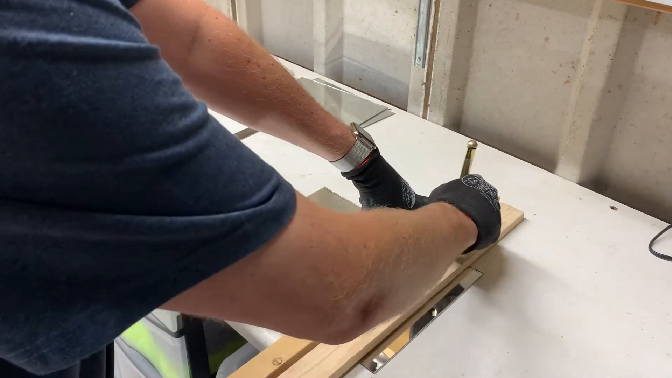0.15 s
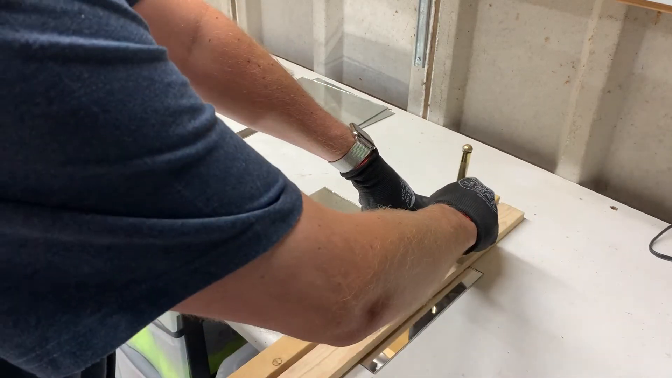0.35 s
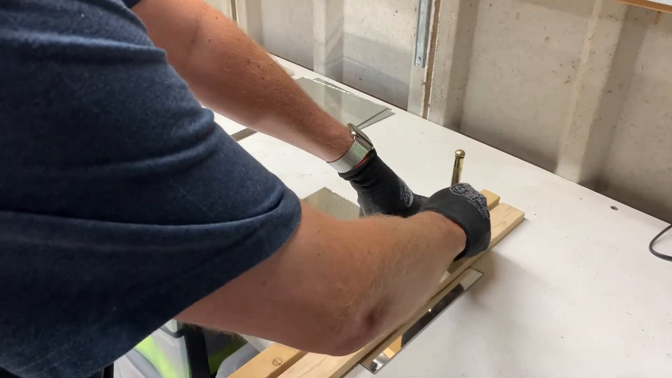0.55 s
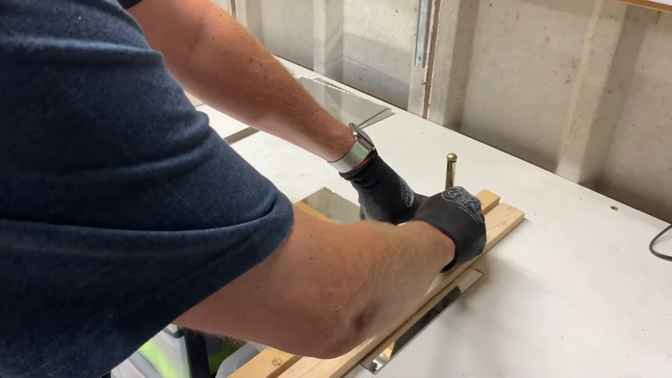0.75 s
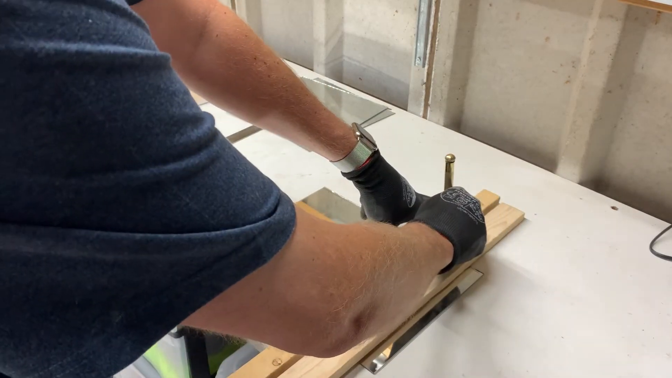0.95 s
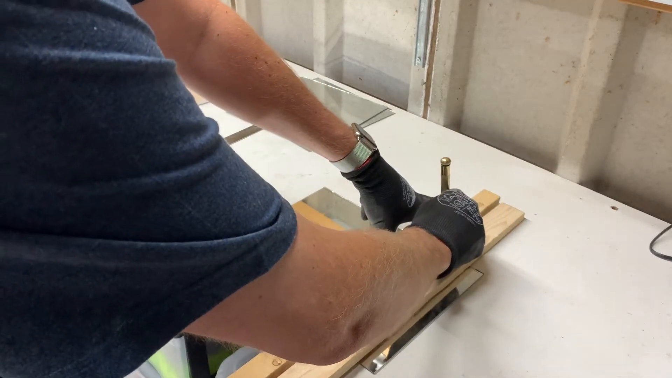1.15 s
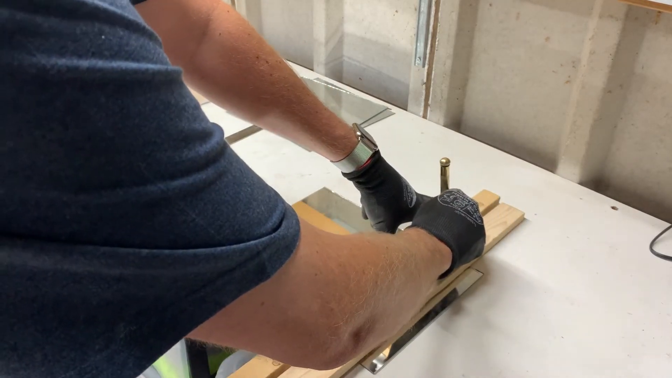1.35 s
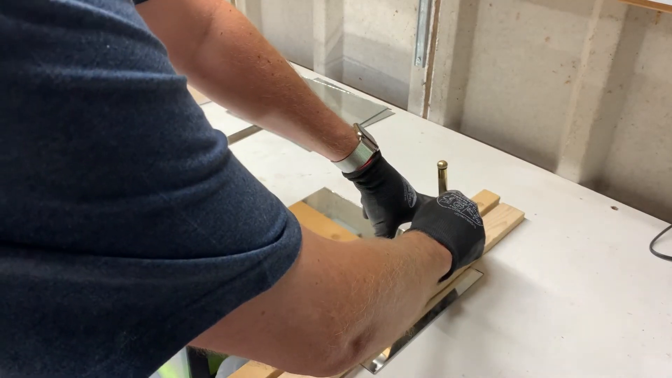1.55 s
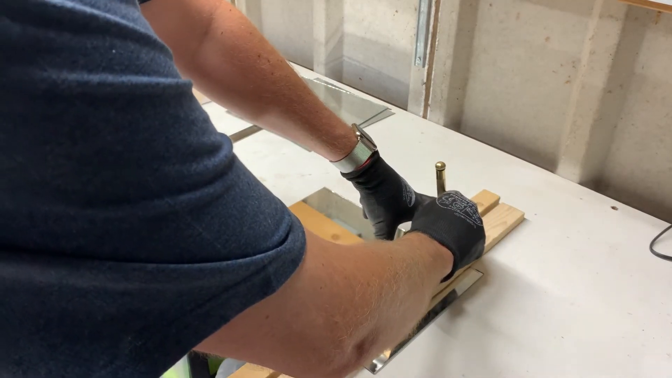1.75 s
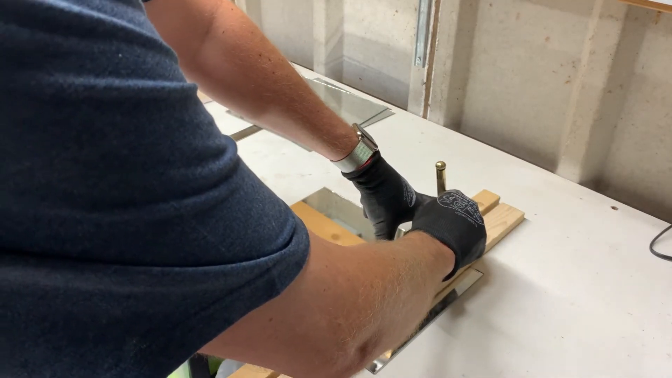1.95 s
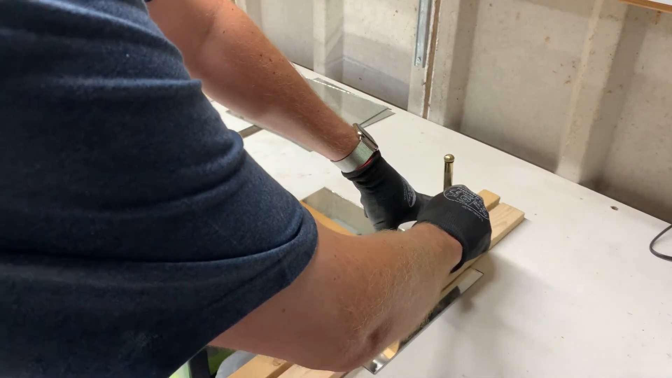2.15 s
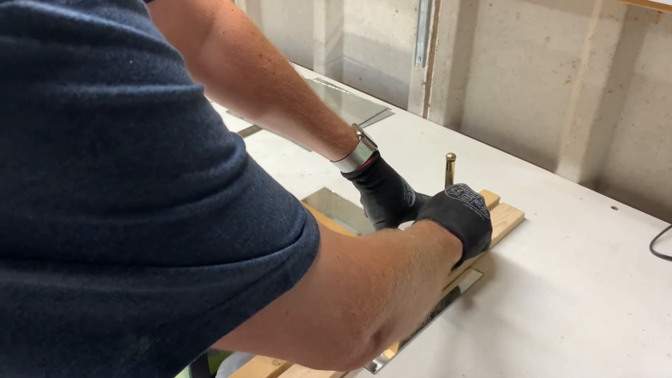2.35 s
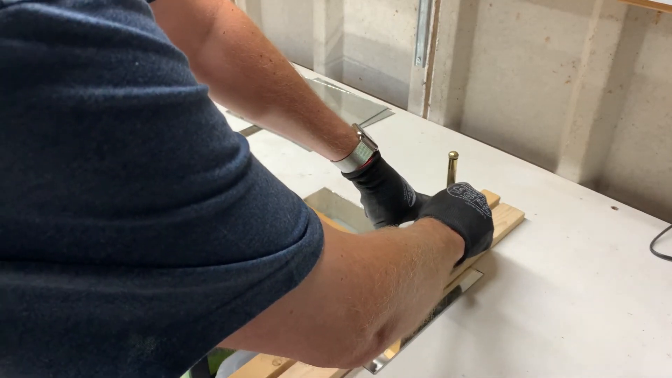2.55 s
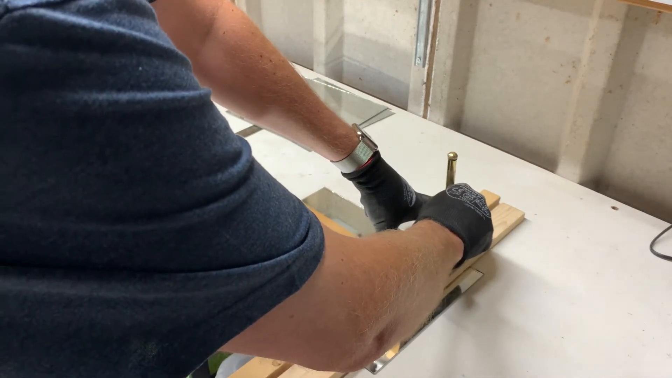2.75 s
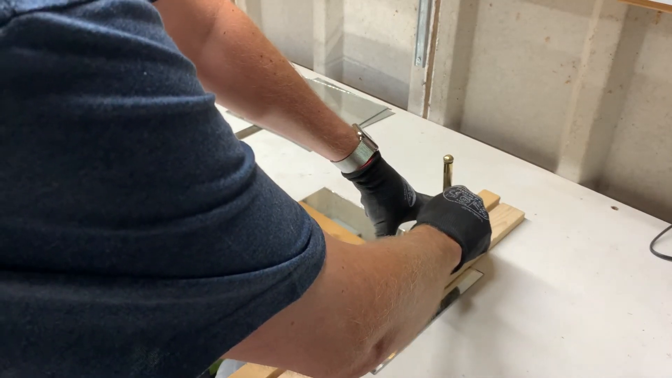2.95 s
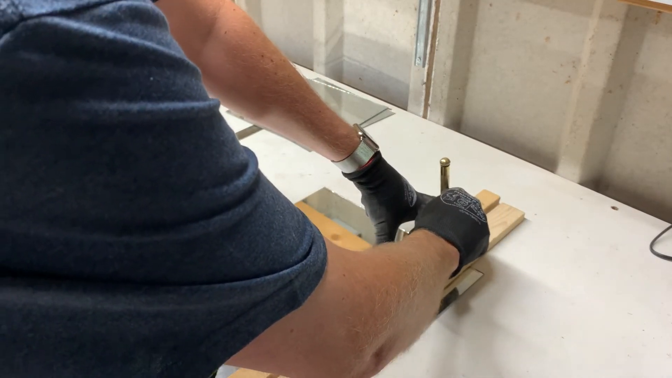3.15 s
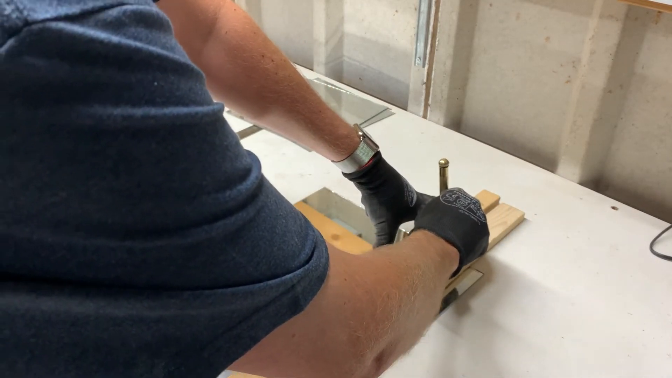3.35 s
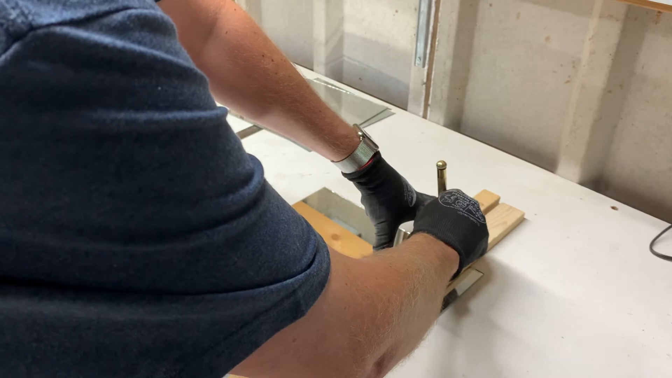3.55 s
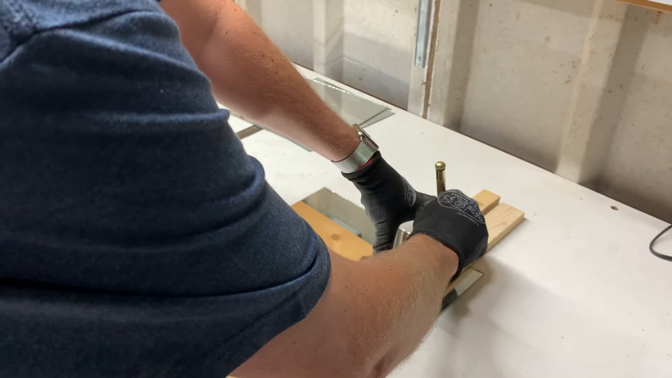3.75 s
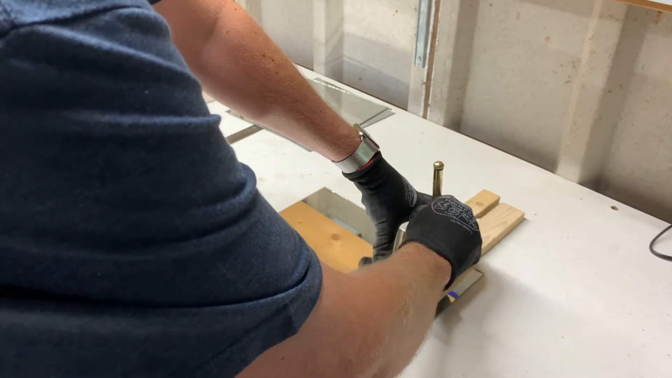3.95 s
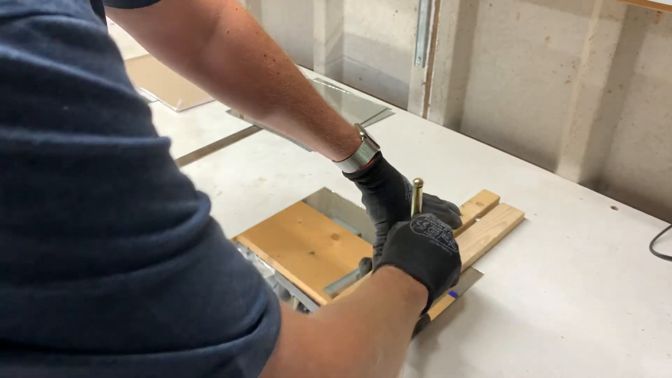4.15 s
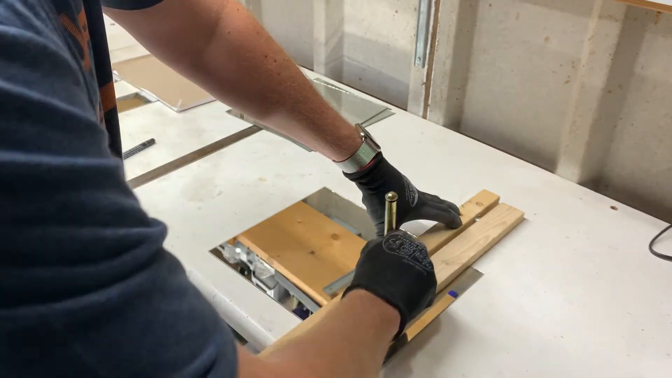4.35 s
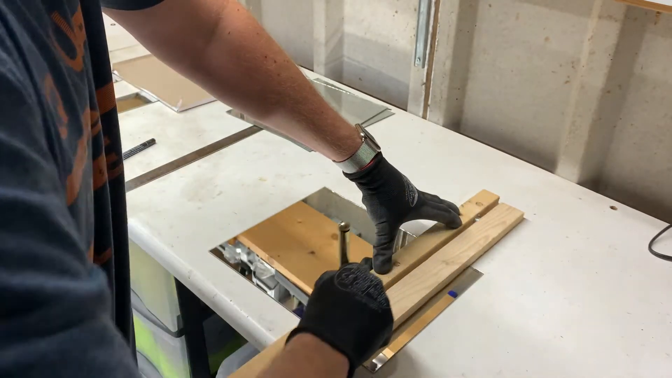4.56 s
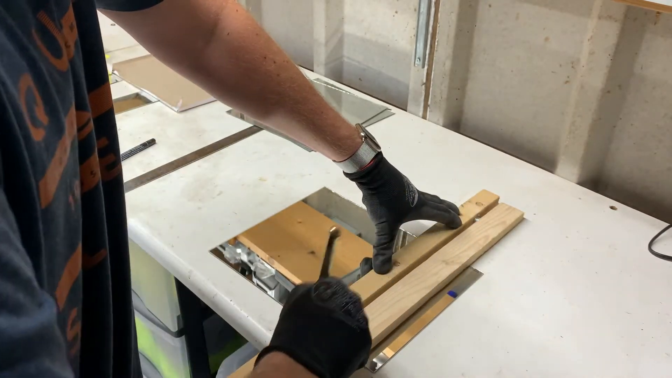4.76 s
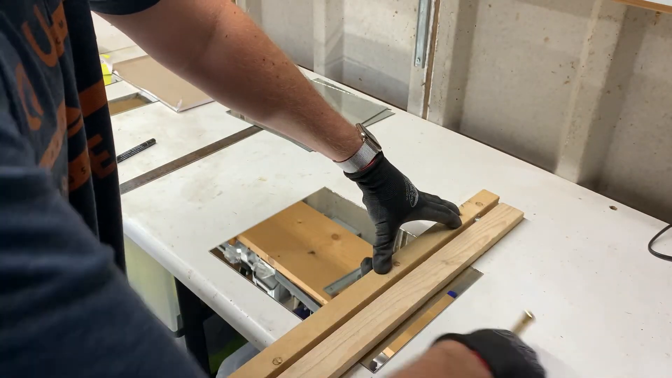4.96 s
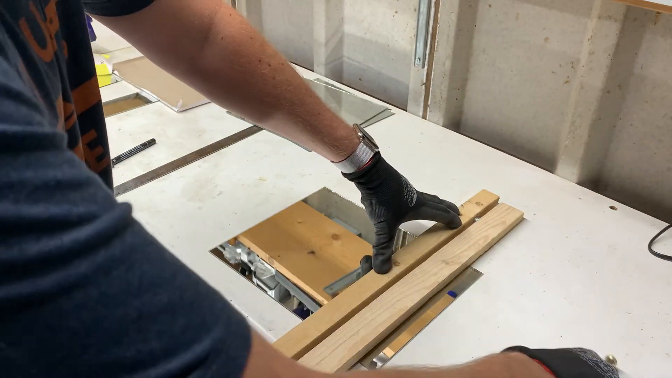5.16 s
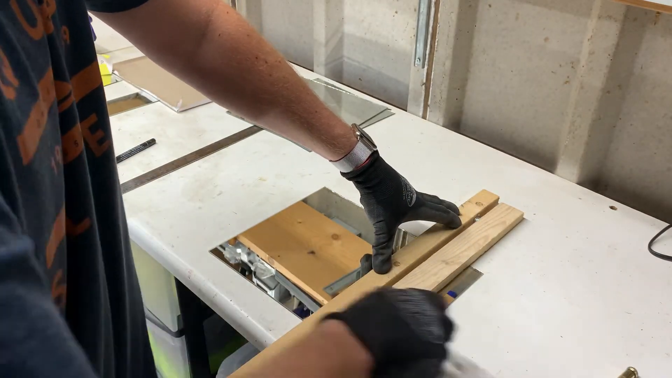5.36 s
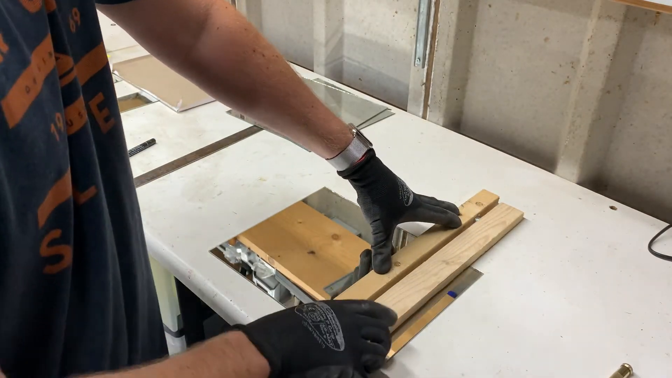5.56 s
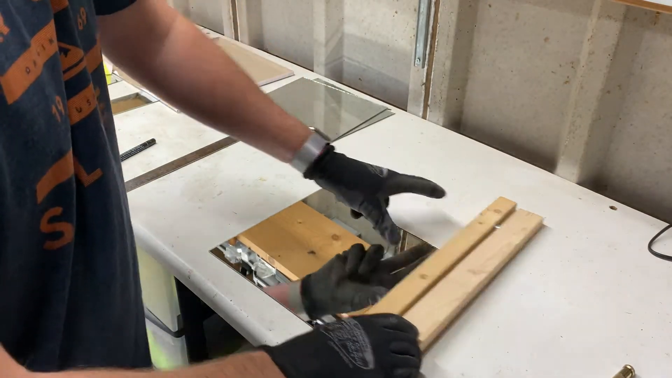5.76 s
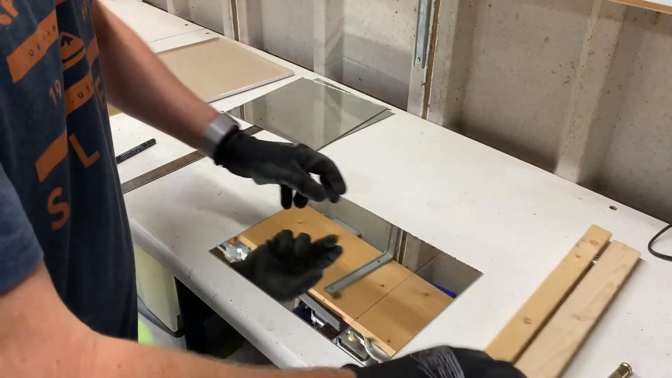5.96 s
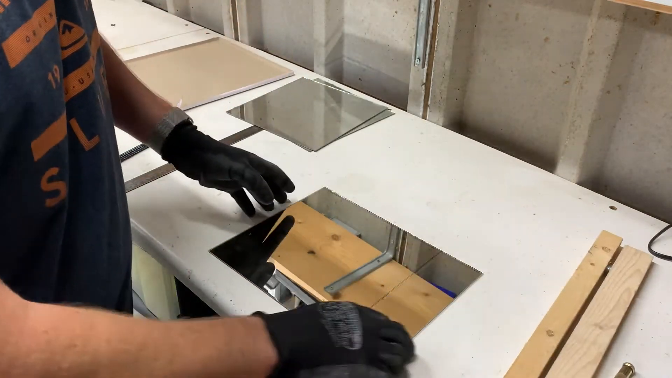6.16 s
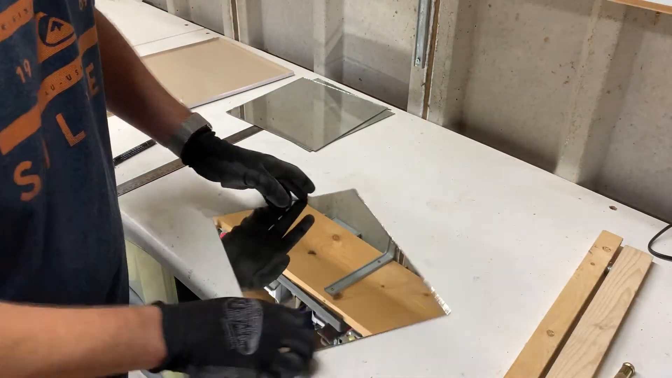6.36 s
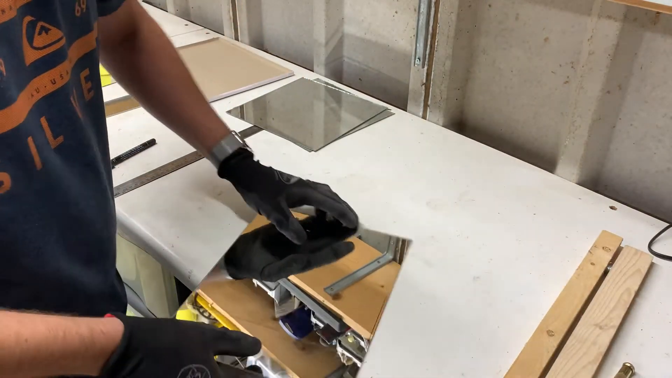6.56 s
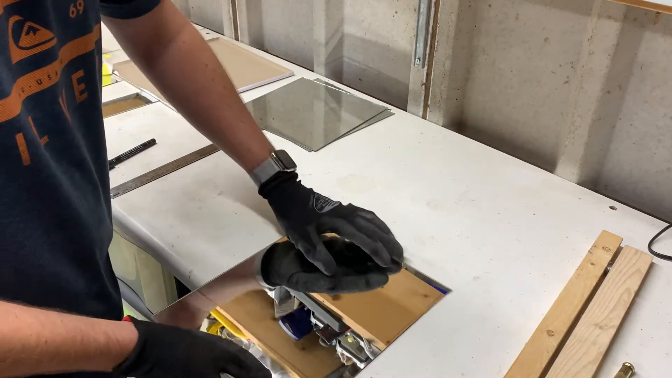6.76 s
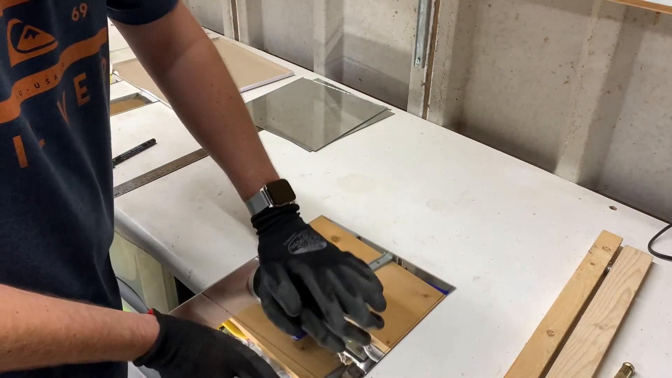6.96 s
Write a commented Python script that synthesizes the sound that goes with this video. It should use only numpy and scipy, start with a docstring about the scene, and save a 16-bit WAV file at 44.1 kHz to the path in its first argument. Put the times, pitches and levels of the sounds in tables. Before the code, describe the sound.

A glass-cutter wheel ticks on a mirror, hisses through one rising score, knocks off the edge, then the cutter clatters down and wood and glass scrape.

```python
"""In the quiet air of a small shed a glove brushes a workbench and a straightedge bumps down. A glass-cutter wheel
ticks as it is lined up on a mirror, hisses along the score, runs off the edge onto the bench, is dropped and skids.
The straightedge is dragged away, bumping; then the mirror is slid and turned on the bench top.
Blows are decaying modes and noise bursts; rubbing is random grit filtered by spectra and resonances.
The thin walls add a short diffuse tail, and two ports with a frequency-dependent likeness listen."""
import sys
import numpy as np
from scipy import signal
from scipy.fft import rfft, irfft, next_fast_len
from scipy.io import wavfile
from scipy.ndimage import map_coordinates

SR = 44100
rng = np.random.default_rng(int(sys.argv[2]) if len(sys.argv) > 2 else 0)


def inscribe(sig):
    """Save sig as 16-bit PCM at rate SR to the path in sys.argv[1].

    A 1-D sig is mono; a 2-D sig holds one channel per row.
    Samples are clipped to [-1, 1] before scaling.
    """
    pcm = np.round(np.clip(np.atleast_2d(sig).T, -1, 1) * 32767)
    wavfile.write(sys.argv[1], SR, pcm.astype(np.int16))


def invert_db(x):
    """Field ratio 10**(x/20) for x, a level in decibels (scalar or array-like)."""
    u = np.asarray(x, float) / 20
    return 10 ** u


N = 309141

# background air of the shed: (frequency [Hz], relative density [dB per Hz])
AIR_SPECTRUM = [(25, -9.5), (60, 8), (100, -2), (280, -10), (900, -20), (2600, -29.5), (7500, -31.5),
                (9000, -23.5), (10000, -30.5), (15500, -31)]
AIR_DB = -59.5  # rms level of the air
# glove over wood and bench: (time [s], bench rumble [dB], hiss [dB])
BRUSH_STROKE = [(0.101, -58, -98), (.25, -44, -84), (.45, -52, -76.5), (.62, -39, -64.5), (.74, -66, -77),
                (2.06, -96, -81), (2.21, -64, -69), (2.3, -92, -108), (3.2, -80, -74), (3.45, -77, -89.5),
                (4.9, -42, -74.5), (5.061, -50, -64), (5.13, -61.5, -83.5)]
BRUSH_SCRAPE_DB = -4.5  # scrape against the mean of rumble and hiss
# straightedge bumps the bench:
# (time [s], woody knock [dB], knock pitch [Hz], bench boom [dB], tick [dB])
BUMPS = [(0.1575, -53, 880, -67, -71), (0.1969, -33, 480, -37, -53), (0.4911, -26.5, 1260, -36, -33),
         (0.5834, -32.5, 640, -34.5, -49), (5.959, -26, 810, -55, -33.5), (6.0306, -17, 800, -31, -20.5),
         (6.0519, -16, 1750, -13, -28), (6.0823, -17.5, 830, -13.5, -51), (6.144, -22, 280, -14, -60),
         (6.2046, -26.5, 1820, -22.5, -50)]
BUMP_CLICK_DB = -16.5  # click against knock
# wheel touches the mirror:
# (time [s], click [dB], glassy tick [dB], woody knock [dB], knock pitch [Hz])
TOUCHES = [(0.5577, -30.5, -34, -31, 1640), (0.9167, -35, -30, -46, 2040), (0.938, -45, -37.5, -48, 352),
           (1.1233, -30.5, -23.5, -44, 405), (1.392, -53.5, -46, -59.5, 1880),
           (1.8386, -48.5, -39, -57, 900), (2.0305, -44.5, -33, -57, 1930), (3.92, -27, -25.5, -36.5, 2020),
           (3.9403, -20.5, -11.5, -27, 634), (3.968, -42.5, -17, -40.5, 550), (3.9911, -29, -55, -33, 665),
           (4.039, -37.5, -23.5, -65.5, 664), (4.055, -34.5, -24, -64, 751), (4.8752, -33, -28, -43.5, 397),
           (6.984, -50, -39.5, -58, 428)]
TOUCH_BOOM_DB = -15.5  # bench boom against click
# faint ticks while the wheel is lined up: time [s]
FIDGET_TIMES = [0.867, 1.035, 1.558, 1.66, 3.179, 3.532]
FIDGET_DB, FIDGET_SPREAD_DB = -59, 2
# wheel along the score: (time [s], hiss [dB])
SCORING_STROKE = [(3.894, -82), (3.92, -46.5), (3.95, -30), (4.03, -45.5), (4.065, -40.5), (4.102, -23.5),
                  (4.2, -20.5), (4.4, -20), (4.56, -13.5), (4.706, -17), (4.729, -32.5)]
FULL_HISS_DB = -10  # hiss level at which a following layer has its full level
SCORE_SCRAPE_DB, SCORE_SCRAPE_FOLLOWS = -23.5, 0.61  # level at full hiss, share of the hiss's swing
SCORE_RUMBLE_DB, SCORE_RUMBLE_FOLLOWS = -44, 0.41
# wheel runs off the edge onto the bench:
# (time [s], woody knock [dB], knock pitch [Hz], bench boom [dB], tick [dB])
RUN_OFF = [(4.7188, -4, 700, -17, -12)]
RUN_OFF_CLICK_DB = -8.5  # click against knock
# brass cutter lands and bounces:
# (time [s], click [dB], bench boom [dB], woody knock [dB], knock pitch [Hz], tick [dB])
DROP = [(5.2771, -10.5, -28, -13, 1900, -5.5), (5.2855, -6, -20.5, -13.5, 1464, -4),
        (5.4132, -26, -39, -28.5, 1970, -18), (5.494, -41, -48, -26.5, 920, -62),
        (5.5677, -30, -67, -31.5, 1630, -50), (5.612, -50, -62.5, -41, 1000, -68),
        (5.722, -47, -63, -51, 693, -70)]
# skid of the dropped cutter, one row each for rumble, scrape, hiss:
# (level at SKID_S [dB], loss [dB per second])
SKID_LEVELS = [(-31.5, 47), (-27.5, 140.5), (-45.5, 155.5)]
SKID_S, SKID_LASTS_S = 5.36, 0.32
# straightedge dragged away: (time [s], bench rumble [dB], scrape [dB])
DRAG_STROKE = [(5.676, -41.5, -60.5), (5.783, -33.5, -46.5), (5.81, -31, -31.5), (5.887, -47.5, -21),
               (5.972, -29, -22), (6.07, -11.5, -28), (6.132, -13, -34.5), (6.189, -23, -39.5),
               (6.25, -30.5, -46), (6.29, -28, -48.5), (6.4, -31.5, -67), (6.54, -46, -80)]
DRAG_HISS_DB = -9  # hiss against scrape
# mirror slid and turned: (time [s], scrape [dB], hiss [dB])
SLIDE_STROKE = [(6.282, -49.5, -41), (6.329, -23, -16.5), (6.41, -21, -24.5), (6.446, -23.5, -18.5),
                (6.461, -15, -20.5), (6.491, -25, -16.5), (6.634, -25.5, -21), (6.662, -34, -29.5),
                (6.687, -21.5, -18.5), (6.79, -27, -26), (6.899, -37, -43.5), (6.99, -61, -72)]
SLIDE_RUMBLE_DB, SLIDE_RUMBLE_FOLLOWS = -36, 0.29  # level at full hiss, share of the hiss's swing
TURNED_S, TURNED_RUMBLE_DB = 6.67, 9.5  # from here the turned mirror scuffs the bench harder
# mirror resonances singing during the slide: (time [s], level [dB])
SING = [(6.285, 2.5), (6.43, 14), (6.447, 14.5), (6.47, 10.5), (6.485, -8), (6.58, -16.5), (6.99, 3)]

# modes of the bench top: (frequency [Hz], level [dB], decay t60 of a struck mode [s])
BENCH_MODES = [(102.8, 5.5, 0.25), (151, -4.5, 0.11), (177.5, -5.5, 0.24), (287.2, -2, 0.12),
               (340, -6, 0.066), (455.3, -6.5, 0.12), (649.2, -1, 0.075), (813, -2.5, 0.06),
               (990, -4, 0.063), (1127, -3.5, 0.02), (1356, -12.5, 0.043), (1930, 1, 0.014)]
# bright modes ringing on the bench when the cutter lands: (frequency [Hz], level [dB], decay t60 [s])
BRIGHT_BENCH_MODES = [(1805, 2.5, 0.05), (2315, -6, 0.06), (2380, -18, 0.055), (2669, -6, 0.095),
                      (3220, -20, 0.038), (3820, -9.5, 0.04)]
# modes of the mirror under the wheel: (frequency [Hz], level [dB], decay t60 [s])
MIRROR_MODES = [(810, -22, 0.16), (3194, 0, 0.027), (4124, -7.5, 0.06), (5350, -9, 0.037)]
# colour of the wheel rolling on glass: (frequency [Hz], relative density [dB per Hz])
WHEEL_SPECTRUM = [(900, -10), (1600, -10), (4000, -6), (7500, 4), (9500, 7), (12000, 9.5), (13500, 5),
                  (15500, 0)]
# colour of rubbed wood: (frequency [Hz], relative density [dB per Hz])
WOOD_SPECTRUM = [(500, 3.5), (900, 0), (2000, -4.5), (5600, -3), (9500, -3.5), (13500, -5), (15500, -13.5)]
# colour of the sliding mirror: (frequency [Hz], relative density [dB per Hz])
GLASS_SPECTRUM = [(500, -3.5), (900, -2.5), (2600, -5.5), (5600, -9), (9500, -2), (12000, 0),
                  (15500, -11.5)]
# resonances of the straightedge: (frequency [Hz], width [Hz], level [dB])
WOOD_RINGS = [(350, 38, 19.5), (800, 18, 7), (1353, 20, 12), (1800, 93, 11.5), (2246, 120, 16),
              (2718, 96, 9), (3060, 230, 15), (3302, 87, 12.5), (3750, 150, 9), (3980, 94, 12),
              (6190, 110, 5)]
# resonances of the sliding mirror: (frequency [Hz], width [Hz], level [dB])
GLASS_RINGS = [(825, 26, 4.5), (1301, 100, 1), (1806, 120, 1), (2040, 230, -1.5), (2774, 120, -2)]
# resonances of the mirror under the rolling wheel: (frequency [Hz], width [Hz], level [dB])
SCORE_RINGS = [(1420, 36, 0), (1610, 50, 5.5), (3076, 220, 1), (4540, 200, -2)]
# resonances of the turned mirror: (frequency [Hz], width [Hz], level [dB])
TURNED_RINGS = [(1050, 44, 8), (1578, 38, 3.5), (2050, 52, 2.2)]
WAVER = 0.016  # spread of the share by which rubbed resonances waver in pitch
KNOCK_FOCUS_DB = 6  # loss of a knock one octave from its own pitch

# decay of the shed: (frequency [Hz], decay t60 [s])
SHED_DECAY = [(300, 0.36), (1000, 0.3), (4000, 0.21), (12000, 0.14)]
# likeness of the right port's sound to the left's: (frequency [Hz], likeness [0-1])
LIKENESS = [(100, 0.96), (250, 0.84), (450, 1), (1000, 0.4), (5500, 0.01), (6500, 0.2), (8000, 0.91)]
# phase between the ports below the treble: (frequency [Hz], lead of the right port [rad])
MID_TURN = [(200, 0.12), (1000, 1.69), (2000, 0.92), (3500, 0.031), (5600, 0.44)]
LEAD_HZ, IN_PHASE_HZ = 4720, 10916  # treble: one phase turn between the ports per LEAD_HZ
CUTOFF_HZ = 15950  # the ports pass nothing above this


def in_time(rows):
    """Piecewise-linear envelopes: columns become sample curves, silent outside the rows."""
    times, *columns = np.transpose(rows)
    return [np.interp(np.arange(N) / SR, times, column, -140, -140) for column in columns]


def at_hz(points, hz):
    """Linear interpolation on a logarithmic frequency axis."""
    table_hz, values = np.transpose(points)
    return np.interp(np.log(hz + 1), np.log(table_hz), values)


def band(x, low_hz, high_hz):
    """Causal band-pass filtering, normalised to unit standard deviation."""
    sections = signal.butter(2, [low_hz, high_hz], "band", fs=SR, output="sos")
    y = signal.sosfilt(sections, x)
    return y / np.std(y)


def drift(rate):
    """Slow random modulation: straight lines join Gaussian values drawn at the given rate [Hz]."""
    return np.interp(np.arange(N) * rate / SR, np.arange(2000), rng.standard_normal(2000))


def ring(clicks, hz, t60):
    """Damped harmonic oscillator: a unit click starts a decaying sine of height 1."""
    radius = invert_db(-60 / (t60 * SR))
    angle = 2 * np.pi * hz / SR
    poles = [1, -2 * radius * np.cos(angle), radius * radius]
    return signal.lfilter([0, np.sin(angle)], poles, clicks + 1e-18)


def coloured(x, spectrum, rings=None):
    """Linear filtering: a spectrum shapes the noise; rings, if given, pass only its resonance peaks."""
    size = next_fast_len(N)
    hz = np.fft.rfftfreq(size, 1 / SR)
    peaks = 1
    if rings is not None:
        peaks = sum(invert_db(db) / (1 + (2 * (hz - centre) / width) ** 2) for centre, width, db in rings)
    return irfft(rfft(x, size) * invert_db(at_hz(spectrum, hz)) * peaks, size)[:, :N]


def streaky(x, streak_db, width_hz, rate):
    """Modal excitation: dense plate modes wax and wane as the contact point travels."""
    hz, times, cells = signal.stft(x, SR, nperseg=1024)
    grid = np.meshgrid(hz / width_hz, times * rate, indexing="ij")
    field = map_coordinates(rng.standard_normal((500, 300)), grid, order=1)
    # low modes are few and steady
    field = field * np.minimum(1, hz / 1500)[:, None]
    return signal.istft(cells * invert_db(streak_db * field), SR, nperseg=1024)[1][:, :N]


def rub(stroke, spectrum, voices, streak_db, flutter_db, flutter_hz,
        grit_db=1.07, rumble_hz=80, damping=0.13):
    """Friction as random impacts: grit scrapes, hisses, excites (rings, level [dB]) and shakes the bench."""
    rumble_db, scrape_db, hiss_db = in_time(stroke)
    grit = rng.standard_normal((2, N)) * invert_db(flutter_db * drift(flutter_hz))
    # rare grains are much stronger than the rest
    grit *= invert_db(grit_db * rng.exponential(1, N))
    sound = coloured(grit, spectrum)
    # reading the resonances at an uneven pace makes their pitch waver
    read = np.arange(N) + np.cumsum(WAVER * drift(14))
    for rings, ring_db in voices:
        resonant = coloured(grit, spectrum, rings)
        wavering = np.array([np.interp(read, np.arange(N), port) for port in resonant])
        sound = sound + invert_db(ring_db) * wavering
    sound = streaky(sound, streak_db, width_hz=55, rate=10)
    scrape = coloured(sound, [(250, -30), (450, 0), (4500, 0), (7000, -30)])
    hiss = sound - coloured(sound, [(4500, 0), (7000, -30)])
    # of the seven lowest bench modes, those above rumble_hz are shaken, with t60 scaled by damping
    shake = sum(invert_db(db) * ring(grit, hz, damping * t60)
                for hz, db, t60 in BENCH_MODES[:7] if hz > rumble_hz)
    return (invert_db(rumble_db) * band(shake, rumble_hz, 600)
            + invert_db(scrape_db) * scrape / np.std(scrape)
            + invert_db(hiss_db) * hiss / np.std(hiss))


def follows(hiss_db, full_db, share):
    """Proportional coupling: a layer rises and falls by a share of the hiss's swing."""
    return full_db + share * (hiss_db - FULL_HISS_DB)


def burst(at, level_db, low_hz, high_hz, t60, rise_s):
    """Transient noise: band noise swells briefly at each blow and decays exponentially."""
    starts = np.full(N, 1e-18)
    starts[at] = invert_db(level_db)
    decay = signal.lfilter([1], [1, -invert_db(-60 / (t60 * SR))], starts)
    smooth = np.exp(-1 / (rise_s * SR))
    envelope = signal.lfilter([1 - smooth], [1, -smooth], decay)
    return envelope * band(rng.standard_normal((2, N)), low_hz, high_hz)


def strike(at, level_db, modes, spread_db):
    """Modal superposition: each blow drives each mode with its own strength at each port."""
    out = np.zeros((2, N))
    for (hz, db, t60), blow_db in zip(modes, level_db):
        clicks = np.zeros((2, N))
        luck = rng.standard_normal((len(at), 3))
        sign = 1 if hz < 220 else np.sign(luck[:, 2])
        # long waves reach both ports more alike, and vary less
        luck = luck * min(1, hz / 400)
        clicks[:, at] = invert_db(blow_db + db + spread_db * luck[:, :2].T) * sign
        # a first, short-lived resonator lets the mode swell over about two cycles
        push = ring(clicks, hz, 5 / hz)
        out += ring(push, hz, t60) * 2.8 * hz / SR
    return out


def blows(rows, modes=(), ring_db=0.0, focus_db=KNOCK_FOCUS_DB):
    """Impact: boom and knock excite the bench, click and tick are cracks, and any further modes given ring.

    Rows: (time [s], click [dB], boom [dB], knock [dB], knock pitch [Hz], tick [dB])."""
    times, click_db, boom_db, knock_db, knock_hz, tick_db = np.transpose(rows)
    at = (times * SR).astype(int)

    def knock_at(hz):
        """Spectral selectivity: a blow favours frequencies near its own pitch."""
        return knock_db - focus_db * np.log2(hz / knock_hz) ** 2

    on_bench = [boom_db if hz < 220 else knock_at(hz) for hz, db, t60 in BENCH_MODES]
    out = strike(at, on_bench, BENCH_MODES, spread_db=5.0)
    for low_hz in (300, 600, 1200):
        out += burst(at, knock_at(1.6 * low_hz) - 0.5, low_hz, 2 * low_hz, 0.12, rise_s=0.0037)
    out += burst(at, click_db, 1900, 4200, 0.053, rise_s=0.0047)
    out += burst(at, tick_db, 4900, 13000, 0.025, rise_s=0.00065)
    on_modes = [np.maximum(click_db, knock_db) + ring_db] * len(modes)
    return out + strike(at, on_modes, modes, spread_db=5.0)


def shed_air():
    """Stationary noise: the quiet shed is Gaussian noise with a fixed spectrum and level."""
    air = coloured(rng.standard_normal((2, N)), AIR_SPECTRUM)
    return invert_db(AIR_DB) * air / np.std(air)


def glove_brush_and_cutter_skid():
    """Dry friction on wood: the glove brushes, and later the dropped cutter skids to rest."""
    brush = [(s, rumble, (rumble + hiss) / 2 + BRUSH_SCRAPE_DB, hiss) for s, rumble, hiss in BRUSH_STROKE]
    skid = [(SKID_S + after, *[db - loss * after for db, loss in SKID_LEVELS])
            for after in (0, SKID_LASTS_S)]
    return rub(brush + skid, WOOD_SPECTRUM, (), streak_db=3.0, flutter_db=3.0, flutter_hz=30)


def straightedge_bumps():
    """Impact of wood on wood: bench and straightedge ring in their own modes."""
    rows = [(s, knock + BUMP_CLICK_DB, boom, knock, hz, tick) for s, knock, hz, boom, tick in BUMPS]
    # the narrower a resonance, the longer it rings
    straightedge_modes = [(hz, db, 3.5 / width) for hz, width, db in WOOD_RINGS]
    return blows(rows, straightedge_modes, ring_db=-29.5)


def wheel_touches():
    """Impact on a plate: each touch of the wheel excites mirror and bench modes."""
    rows = [(s, click, click + TOUCH_BOOM_DB, knock, hz, tick) for s, click, tick, knock, hz in TOUCHES]
    return blows(rows, MIRROR_MODES, ring_db=-8.5)


def fidget():
    """Light contact: the wheel's faint ticks on the mirror are short bursts of noise."""
    at = (np.array(FIDGET_TIMES) * SR).astype(int)
    level_db = rng.normal(FIDGET_DB, FIDGET_SPREAD_DB, len(at))
    return burst(at, level_db, 2500, 14000, 0.04, rise_s=0.0007)


def scoring():
    """Rolling excitation: the wheel hisses along the score and sets mirror resonances ringing."""
    stroke = [(s, follows(hiss, SCORE_RUMBLE_DB, SCORE_RUMBLE_FOLLOWS),
               follows(hiss, SCORE_SCRAPE_DB, SCORE_SCRAPE_FOLLOWS), hiss) for s, hiss in SCORING_STROKE]
    return rub(stroke, WHEEL_SPECTRUM, [(SCORE_RINGS, 0)], streak_db=6.0,
               flutter_db=1.8, flutter_hz=60, grit_db=1.8, rumble_hz=130)


def wheel_runs_off():
    """Impact on the bench: the wheel leaves the edge, and its knock spreads over more modes."""
    rows = [(s, knock + RUN_OFF_CLICK_DB, boom, knock, hz, tick) for s, knock, hz, boom, tick in RUN_OFF]
    return blows(rows, focus_db=4.0)


def cutter_drop():
    """Repeated impact: the brass cutter lands and bounces, ringing bright modes of the bench and what lies on it."""
    return blows(DROP, BRIGHT_BENCH_MODES, ring_db=-2.5)


def straightedge_drag():
    """Sliding friction of wood: grit excites the straightedge's resonances and shakes the bench."""
    stroke = [(s, rumble, scrape, scrape + DRAG_HISS_DB) for s, rumble, scrape in DRAG_STROKE]
    return rub(stroke, WOOD_SPECTRUM, [(WOOD_RINGS, 4.0)], streak_db=4.0,
               flutter_db=2.5, flutter_hz=70, rumble_hz=70, damping=0.8)


def mirror_slide():
    """Sliding friction of a plate: the mirror sings, then rings at further pitches once turned."""
    stroke = []
    for s, scrape, hiss in SLIDE_STROKE:
        rumble = follows(hiss, SLIDE_RUMBLE_DB, SLIDE_RUMBLE_FOLLOWS) + TURNED_RUMBLE_DB * (s > TURNED_S)
        stroke.append((s, rumble, scrape, hiss))
    turned_db = np.where(np.arange(N) > TURNED_S * SR, 0, -140)
    voices = [(GLASS_RINGS, in_time(SING)[0]), (TURNED_RINGS, turned_db)]
    return rub(stroke, GLASS_SPECTRUM, voices, streak_db=5.5,
               flutter_db=2.8, flutter_hz=45, rumble_hz=140)


def shed(x, wet_db):
    """Reverberation: thin walls return a dense diffuse tail that dies sooner in the treble."""
    t = np.arange(SR // 2) / SR
    tail = np.zeros((2, len(t)))
    for low in 240 * 2.0 ** np.arange(6):  # octave bands
        noise = band(rng.standard_normal((2, len(t))), low, 2 * low)
        tail += np.sqrt(low) * noise * invert_db(-60 * t / at_hz(SHED_DECAY, low))
    tail = tail * np.minimum(t / 0.00097, 1)
    # unit energy per port on average
    tail = tail / np.sqrt(np.sum(tail ** 2) / 2)
    return invert_db(wet_db) * signal.fftconvolve(x, tail, axes=1)[:, :N]


def scene():
    """Superposition: the air, the blows and strokes on the bench, and their reverberation add up."""
    air = shed_air()
    bench = glove_brush_and_cutter_skid() + straightedge_bumps() + wheel_touches() + fidget()
    bench += scoring() + wheel_runs_off() + cutter_drop()
    bench += straightedge_drag() + mirror_slide()
    # the blows and strokes carry little below about 70 Hz
    bench = signal.sosfilt(signal.butter(2, 70, "high", fs=SR, output="sos"), bench)
    return bench + shed(bench, wet_db=-8.5) + air


def low_pass(x):
    """Removes everything above the highest recorded frequency."""
    return signal.sosfilt(signal.butter(12, 16990, fs=SR, output="sos"), x)


def record(dry):
    """Interchannel coherence: the right port hears the treble 0.2 ms early; the loudest blows overload."""
    size = next_fast_len(N)
    left, other = rfft(dry, size)
    hz = np.fft.rfftfreq(size, 1 / SR)
    alike = np.clip(at_hz(LIKENESS, hz), 0, 1)
    treble_turn = np.minimum(2 * np.pi * (hz - IN_PHASE_HZ) / LEAD_HZ, 2 * np.pi)
    turn = np.where(hz < 5900, at_hz(MID_TURN, hz), treble_turn)
    right = alike * left * np.exp(1j * turn) + np.sqrt(1 - alike ** 2) * other
    top = np.clip((CUTOFF_HZ - hz) / 300, 0, 1)
    ports = irfft(np.array([left, right]) * top, size)[:, :N]
    # smooth saturation towards full scale
    mix = ports / (1 + np.abs(ports) ** 6) ** (1 / 6)
    return low_pass(mix)


dry = scene()
out = record(dry)
inscribe(out)
```